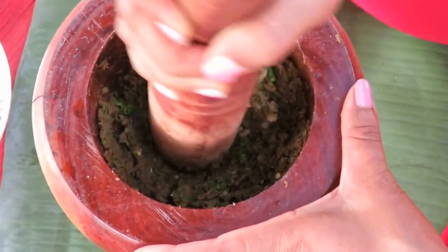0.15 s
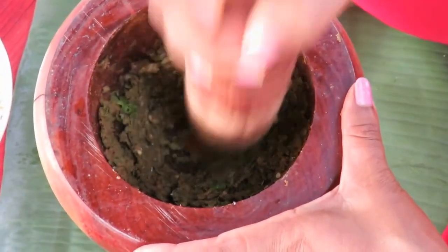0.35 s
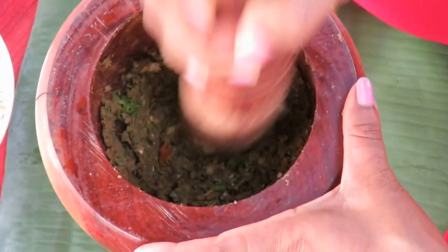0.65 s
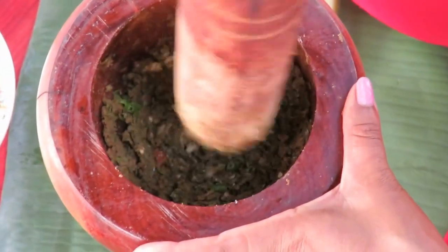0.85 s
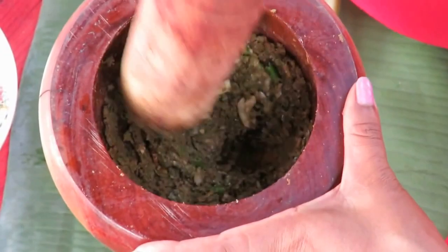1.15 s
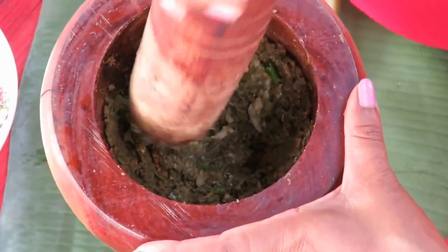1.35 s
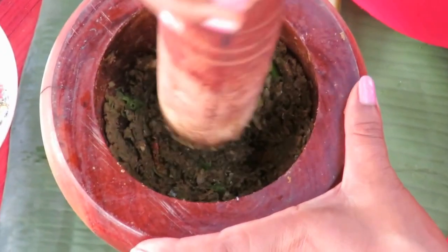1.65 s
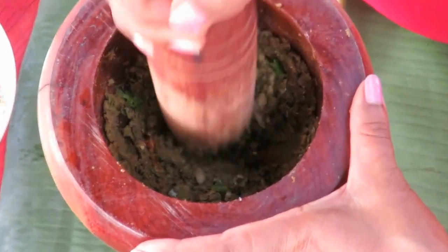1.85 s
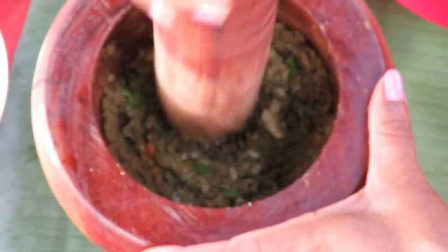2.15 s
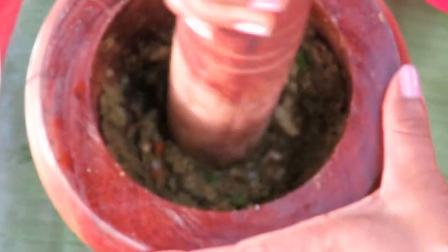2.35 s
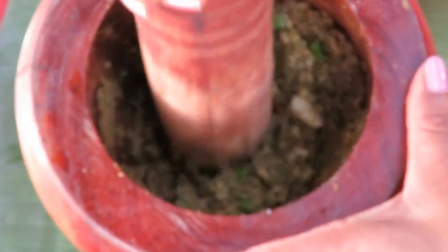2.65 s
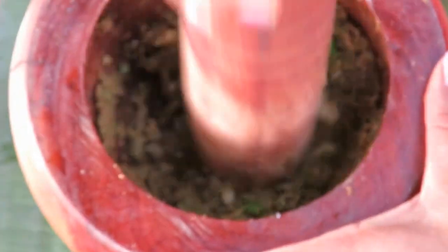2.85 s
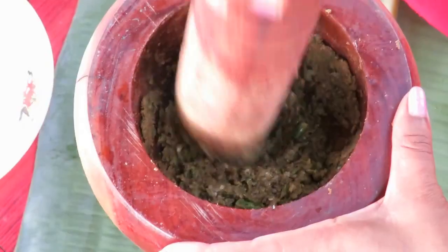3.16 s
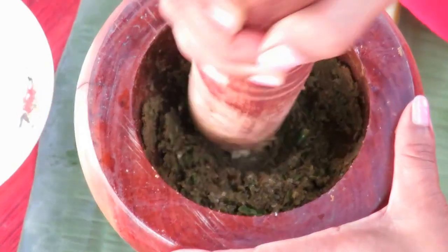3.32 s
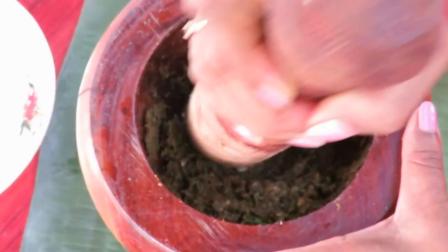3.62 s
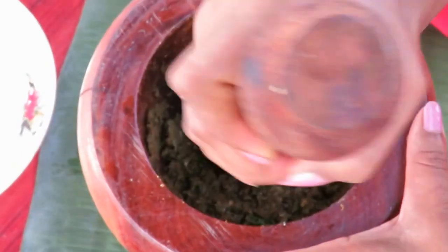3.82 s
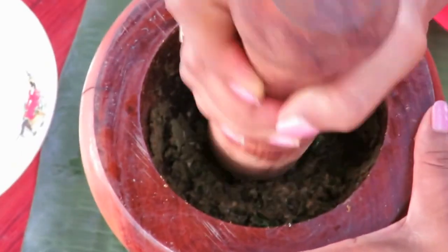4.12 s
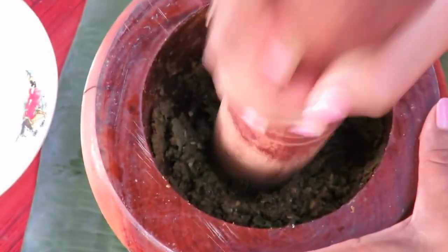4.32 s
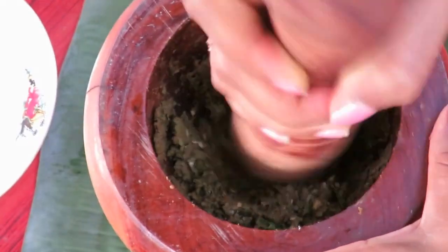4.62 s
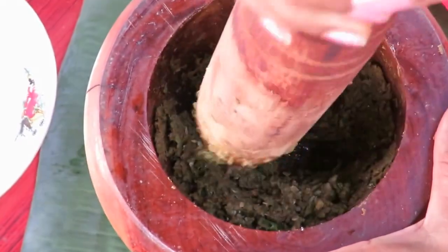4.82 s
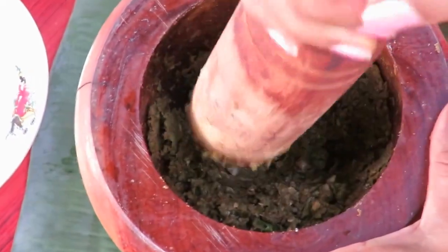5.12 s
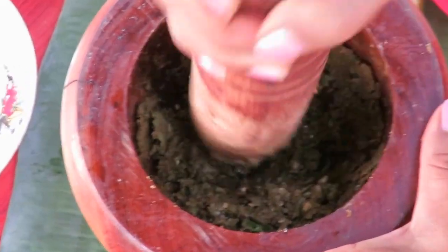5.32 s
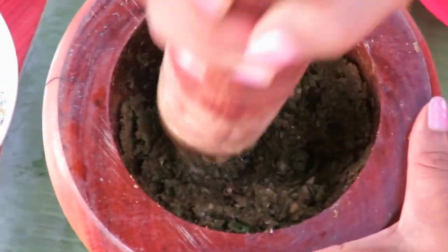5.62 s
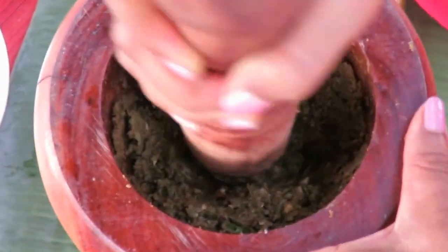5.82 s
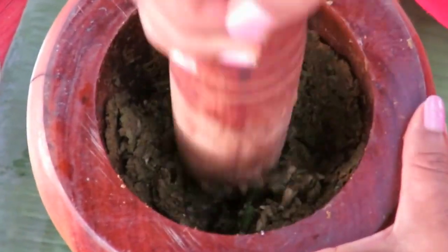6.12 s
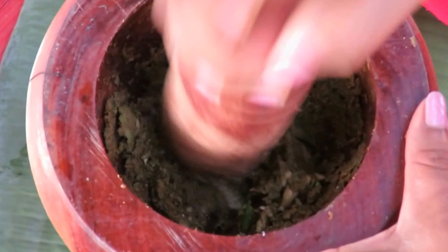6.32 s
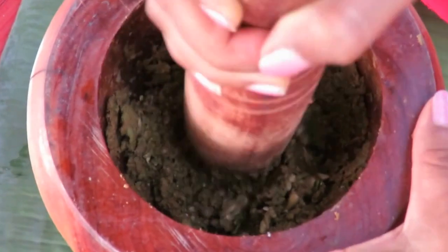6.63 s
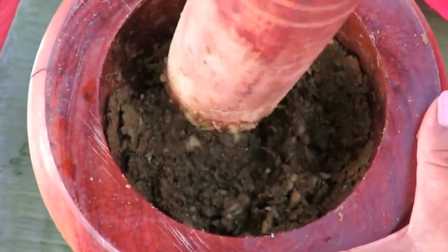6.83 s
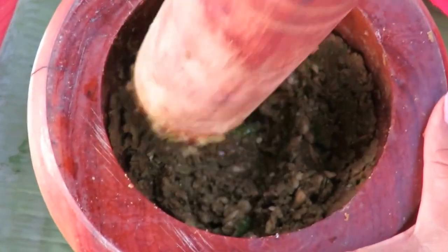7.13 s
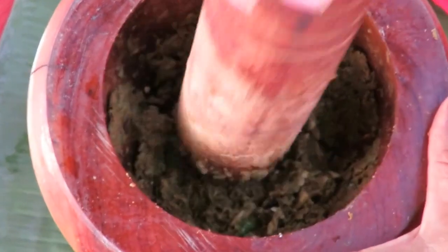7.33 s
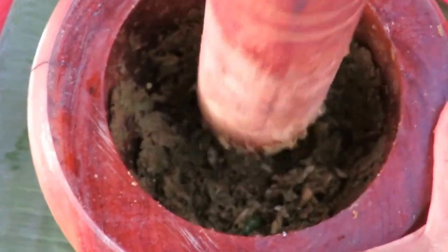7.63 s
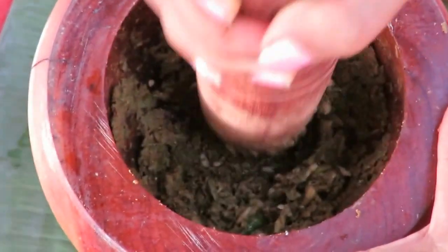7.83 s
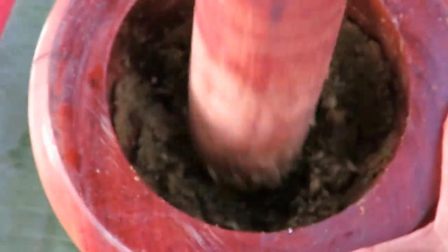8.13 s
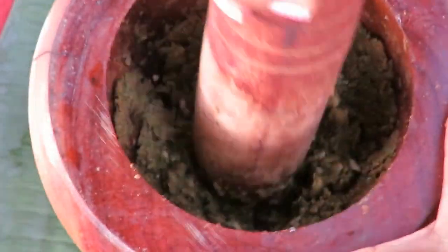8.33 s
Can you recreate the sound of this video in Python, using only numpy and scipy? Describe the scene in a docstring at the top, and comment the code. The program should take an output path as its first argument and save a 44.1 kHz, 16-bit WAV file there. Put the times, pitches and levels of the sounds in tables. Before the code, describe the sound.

Steady hollow wooden pounding in a mortar close up outdoors, uneven in force, each knock crunching wet grit and bumping wood over faint airy hiss.

```python
"""A wooden pestle pounds a coarse paste in a deep wooden mortar outdoors, three to four blows a second.
Each blow crunches grains of shaped noise, rings the modes of the wood and thumps the table; then the wood
bumps and chatters until the pestle is lifted. The first blow, at 0.2 s, is hard; two soft rubs of filtered
noise follow near 1 s, and more hard blows near 1.6, 3.5, 5.5 and 8.5 s. Wind gusts, hiss and rumble are noise.
The hardest blows overload the recorder; its gain control ducks and creeps back, the background with it."""
import sys
import numpy as np
from scipy import signal
from scipy.fft import rfft, irfft
from scipy.io import wavfile
from scipy.ndimage import uniform_filter1d

SR = 44100
rng = np.random.default_rng(int(sys.argv[2]) if len(sys.argv) > 2 else 0)


def pcm_store(signal):
    """Save signal as 16-bit PCM."""
    levels = np.round(np.clip(np.atleast_2d(signal), -1, 1) * 32767)
    wavfile.write(sys.argv[1], SR, levels.astype(np.int16).T)


N = 373527  # length in samples

# pestle blows: [t/s, thud of the base level/dB, low knock of the bowl level/dB, high knock level/dB,
#                crack of hard contact level/dB, crunch of the paste level/dB, crunch half length/s]
BLOWS = [(0.239, -7, 2.5, 14, -10.5, -41.5, 0.029), (0.5205, -25.5, -34, -30, -52, -47, 0.014),
         (0.8154, -17.5, -21.5, -28.5, -41.5, -43, 0.014), (1.089, -17, -28, -55, -43, -44, 0.017),
         (1.357, -13, -18, -21.5, -39.5, -44, 0.017), (1.624, -9.5, -0.5, 9, -18, -60, 0.055),
         (1.893, -7.5, -7.5, -29, -50.5, -72, 0.11), (2.175, -18, -21.5, -18, -35.5, -48, 0.019),
         (2.453, -14, -13, -17, -37, -39, 0.02), (2.709, -27.5, -43, -62, -68, -44.5, 0.033),
         (3.0209, -17, -16.5, -18.5, -39, -45.5, 0.0079), (3.046, -19, -5, -10, -60, -44, 0.017),
         (3.342, -7, -0.5, 6.5, -10, -48, 0.013), (3.624, -4, 1, 15.5, -14.5, -62, 0.059),
         (3.9041, -16, -32, -22, -37.5, -47, 0.013), (4.189, -8, -14, -17.5, -37, -41, 0.025),
         (4.48, -17.5, -43, -33, -39, -41.5, 0.013), (4.7495, -11.5, -7, -1, -15.5, -42, 0.031),
         (5.057, -19.5, -49, -23.5, -53, -41, 0.011), (5.3365, -5, 5, 8, -14, -57.5, 0.063),
         (5.624, -3, 0, 10, -20.5, -46.5, 0.04), (5.9038, -10.5, -4.5, 7, -23, -51, 0.049),
         (6.2163, -32, -39, -42, -68, -54.5, 0.012), (6.48, -15, -20, -17, -37, -46, 0.016),
         (6.7579, -14.5, -4.5, -0.5, -32.5, -44, 0.012), (7.0377, -16, -16, -13, -36.5, -46, 0.021),
         (7.3292, -17, -18.5, -19, -69, -41.5, 0.016), (7.6236, -11.5, -5.5, -0.5, -32.5, -48.5, 0.014),
         (7.892, -9.5, -6, 4.5, -26, -47, 0.037), (8.171, -19.5, -20, -25, -38, -43, 0.013),
         (8.4608, -5, -5.5, 8, -16.5, -45, 0.063)]
# bumps of pestle and mortar after a blow: [t/s, thud level/dB, knock level/dB]
REBOUNDS = [(0.001, -12, -9.5), (0.016, -11, -24), (0.04, -21.5, -10), (0.311, -22, -18.5),
            (0.55, -21, -21.5), (0.597, -30, -43), (0.845, -24, -18.5), (0.887, -23.5, -30),
            (1.109, -29, -21), (1.38, -28, -17.5), (1.41, -22.5, -10.5), (1.676, -22, -21),
            (1.911, -14.5, -21.5), (1.97, -27, -20.5), (2.19, -30, -12), (2.209, -35, -21),
            (2.254, -29.5, -63), (2.486, -24, -16), (2.536, -27.5, -30), (2.762, -26, -25),
            (2.803, -21.5, -27.5), (3.033, -17, -23), (3.067, -17, -9), (3.096, -22.5, -24),
            (3.13, -22, -20), (3.389, -21.5, -19.5), (3.655, -28, -22.5), (3.949, -25, -17),
            (4.237, -17.5, -10), (4.499, -16, -21.5), (4.522, -27, -13), (4.814, -27, -16.5),
            (5.08, -17.5, -12), (5.104, -27, -13.5), (5.12, -18, -23.5), (5.358, -21.5, -19.5),
            (5.676, -24, -17), (6.277, -30.5, -38), (6.533, -24.5, -13), (6.775, -38, -31),
            (7.059, -28, -35.5), (7.073, -55, -22), (7.087, -52, -59), (7.367, -29.5, -22.5),
            (7.4, -24.5, -43), (7.522, -35.5, -56), (7.666, -34, -21.5), (7.94, -39, -23.5),
            (8.195, -18.5, -17), (8.242, -25, -58)]
# the ringing modes of the wood: [f/Hz, level/dB, longest time to fall by 60 dB/s]
WOOD = [(142, -8.5, 0.01), (175.55, 3.5, 0.045), (198, -10.5, 0.09), (297, -8, 0.047), (374.5, -15, 0.046),
        (449.5, 0, 0.025), (519, -20.5, 0.079), (701, -1, 0.017), (862, -7.5, 0.016), (998, -2, 0.014),
        (1321, 1, 0.016), (1640.4, 1.5, 0.062), (2092, 0, 0.015), (2790, -2, 0.013), (3460, -7.5, 0.0098),
        (4060, -5.5, 0.0077), (6400, -16, 0.0074), (12300, -5.5, .003)]
# where thud, low knock, high knock and crack drive the modes: [f/Hz]
DRIVE_HZ = [215, 450, 715, 1640]


def from_db(db):
    """Turns decibels into gain."""
    return 10 ** (np.asarray(db) / 20)


def rms_one(x):
    """Scales a sound to an average (rms) level of 1."""
    return x / np.sqrt(np.mean(x ** 2) + 1e-20)


def at_hz(points, hz):
    """Reads between the points of a table on a log-frequency axis."""
    points = np.array(points)
    return np.interp(np.log(hz), np.log(points[:, 0]), points[:, 1])


def clicks(seconds, sizes):
    """Places single samples of the given sizes at the given times."""
    train = np.full(N, 1e-18)
    places = np.clip((np.asarray(seconds) * SR).astype(int), 0, N - 1)
    np.add.at(train, places, sizes)
    return train


def fade(x, t60):
    """Lets every sample die away, by 60 dB in t60 seconds."""
    return signal.lfilter([1], [1, -from_db(-60 / (t60 * SR))], x)


def ring(x, hz, t60):
    """A resonance: a click of size 1 sets off a sine of starting height 1 that dies away over t60."""
    r, w = from_db(-60 / (t60 * SR)), 2 * np.pi * hz / SR
    return signal.lfilter([0, np.sin(w)], [1, -2 * r * np.cos(w), r * r], x)


def band(x, low_hz, high_hz):
    """Keeps the frequencies between two limits."""
    return signal.sosfilt(signal.butter(2, [low_hz, high_hz], "band", fs=SR, output="sos"), x)


def swells(rows):
    """Adds up smooth bell-shaped rises and falls in level."""
    t = np.arange(N) / SR
    return sum(from_db(db) * np.exp(-((t - s) / half) ** 2) for s, db, half in rows)


def coloured(spectrum, mid, side):
    """Gives two noises a spectrum and mixes them into a stereo pair with rms 1."""
    # how alike left and right are: [f/Hz, likeness (1 = the same)]
    likeness = [(60, 1), (290, 0.31), (1400, 0.51), (6800, 0.21), (15000, 0.12)]
    hz = np.maximum(np.arange(N // 2 + 1) * SR / N, 1)
    alike = np.clip(at_hz(likeness, hz), -1, 1)
    shared = np.sqrt(1 + alike) * rfft(mid)
    opposed = np.sqrt(1 - alike) * rfft(side) * [[1], [-1]]
    return rms_one(irfft((shared + opposed) * from_db(at_hz(spectrum, hz)), N))


def mortar(chatter_per_s, chatter_db, chatter_t60):
    """Blows and rebounds ring the wood; small chance contacts chatter after each until the lift."""
    rebound_lasts = 0.72  # a bump thuds for this share of a blow's time
    chatter_cycles = 30  # wood still in contact rings no longer than this
    scrape_from_hz = 1500  # modes from here up get a steady scrape instead of single touches
    lift_s, lift_soft_s = 0.118, 0.018  # delay from blow to lift, and how gradually the chatter stops
    blows = [blow[:5] for blow in BLOWS]
    # rebounds are soft: far less crack than knock
    rebounds = [(s, thud, knock, knock - 4.0, knock - 31.0) for s, thud, knock in REBOUNDS]
    contacts = blows + rebounds

    out = np.zeros(N + SR)
    for k, (s, *levels_db) in enumerate(contacts):
        lasts = 1 if k < len(BLOWS) else rebound_lasts
        sound = strike(s, levels_db, detune=0.065, spread_db=1.87, lasts=lasts)
        out[int(s * SR):int(s * SR) + len(sound)] += sound
    out = out[:N]

    touches = rng.random(N) < chatter_per_s / SR
    t = np.arange(N) / SR
    landed = np.append(0, np.transpose(BLOWS)[0])
    since_blow = t - landed[np.searchsorted(landed, t, "right") - 1]
    down = 1 / (1 + np.exp((since_blow - lift_s) / lift_soft_s))
    chatter_starts = np.transpose(contacts)[0] + 0.016
    for hz, level_db, t60 in WOOD:
        drive_db = np.array([np.interp(np.log(hz), np.log(DRIVE_HZ), row[1:]) for row in contacts])
        # chatter never gets hard: the higher the mode, the less it takes
        most_db = -15 - 5.3 * np.log2(hz / 215)
        chance_db = 4 * rng.uniform(-1, 1, len(contacts))
        starts = clicks(chatter_starts, from_db(np.minimum(drive_db, most_db) + chance_db))
        after = fade(starts, chatter_t60)
        contact = touches if hz < scrape_from_hz else np.sqrt(chatter_per_s / SR)
        push = contact * down * after * np.clip(rng.standard_normal(N), -2, 2)
        out += from_db(level_db + chatter_db) * ring(push, hz, min(t60, chatter_cycles / hz))
    # a small body radiates little below its lowest mode
    return signal.sosfilt(signal.butter(6, 125, "high", fs=SR, output="sos"), out)


def strike(s, levels_db, detune, spread_db, lasts):
    """One contact: every mode swells in and rings, a little off its pitch as grip and paste shift."""
    ring_cycles = 80  # the paste smothers a ring within so many cycles
    steady_above_hz = 300  # above this, the shift in pitch gets ever smaller
    hz, level_db, t60 = (column[:, None] for column in np.transpose(WOOD))
    t60 = np.where(hz <= DRIVE_HZ[0], lasts, 1) * np.minimum(t60, ring_cycles / hz)
    t = np.arange(int(0.2 * SR)) / SR
    drive_db = np.interp(np.log(hz), np.log(DRIVE_HZ), levels_db)
    spread, shift, phase = rng.standard_normal((3, len(WOOD), 1))
    swell = 1 - np.exp(-(t / (0.00068 + 0.35 / hz)) ** 2)  # low modes swell in more slowly
    height = from_db(level_db + drive_db + spread_db * spread - 60 * t / t60)
    shifted_hz = hz * (1 + detune * np.minimum(steady_above_hz / hz, 1) * shift)
    rings = height * np.sin(2 * np.pi * shifted_hz * t + 0.5 * phase)
    return np.sum(swell * rings, axis=0)


def table():
    """The table top flexes under each blow: a softened push rings one deep, short resonance."""
    base_db, follows = -35, 0.71  # level, and the share of the high knock's dB added to it
    s, _, _, knock_db = np.transpose(BLOWS)[:4]
    push = signal.lfilter([0.02], [1, -0.98], clicks(s, from_db(base_db + follows * knock_db)))
    return ring(push, hz=47.3, t60=0.072)


def paste(grains_per_s, grain_db, bowl_db, lead_db, lead_s):
    """Uneven grains break under each press and around each impact, and set the upper modes humming."""
    # more crunches of the paste, many just before a blow or by a bump: [peak t/s, level/dB, half length/s]
    more_crunches = [(0.005, -44.5, 0.033), (0.507, -52, 0.0068), (0.799, -54, 0.0089),
                     (1.138, -57.5, 0.016), (1.347, -46, 0.0073), (1.431, -54, 0.014),
                     (2.159, -55.5, 0.011), (2.26, -56, 0.006), (3.009, -43.5, 0.0057), (4.258, -48, 0.021),
                     (4.532, -53.5, 0.065), (4.831, -53.5, 0.0061), (5.044, -39.5, 0.0061),
                     (5.123, -53, 0.013), (6.193, -51, 0.018), (6.546, -54, 0.025), (7.612, -46.5, 0.011),
                     (8.16, -44, 0.0064)]
    # a hard grain breaks: [t/s, level/dB]
    snaps = [(3.115, -59.5), (8.249, -64)]
    # spectrum of the crunch: [f/Hz, relative level per Hz/dB]
    grit_spectrum = [(700, -6), (2460, -2.5), (4230, -8), (8700, -24), (13800, -30.5), (15000, -37)]
    snap_s, snap_db = 0.002, 31.5  # half length of a snap; its size over the fine grains
    press_lead_s, peak_share = 0.0058, 0.47  # press starts before the blow, peaks at a share of half length
    bump_db, bump_s = -63, 0.031  # each bump crushes a little more paste
    rise_share, rise_s = 0.45, 0.007  # a crunch rises over this share of its half length, at most rise_s
    grain_cycles = 12  # each grain rings briefly at a pitch of its own

    presses = [(s - press_lead_s + peak_share * half, db, half) for s, *_, db, half in BLOWS]
    impacts = [(blow[0], blow[4] + lead_db, lead_s) for blow in BLOWS]
    bumps = [(s, bump_db, bump_s) for s, *_ in REBOUNDS]
    breaks = [(s, db, snap_s) for s, db in snaps]
    t, shape = np.arange(N) / SR, np.zeros(N)
    for s, db, half in presses + impacts + bumps + more_crunches + breaks:
        near = slice(max(int((s - 3 * half) * SR), 0), int((s + 5 * half) * SR))
        from_peak = t[near] - s
        width = np.where(from_peak < 0, min(rise_share * half, rise_s), half)
        shape[near] += from_db(db) * np.exp(-(from_peak / width) ** 2)

    sizes = from_db(grain_db * np.minimum(rng.exponential(1, (2, N)), 5)) * rng.choice([-1, 1], (2, N))
    # grains break in clumps of about 3 ms, each pitch in its own
    clumps = np.repeat(rng.gamma(3, 1 / 3, N // 128 + 1), 128)[:N]
    grains = sizes * (rng.random((2, N)) < grains_per_s / SR)
    pitches = np.geomspace(504, 13400, num=16)
    dealt = rng.integers(len(pitches), size=N)
    pair = 0
    for k, hz in enumerate(pitches):
        struck = np.roll(clumps, k * N // 17) * grains * (dealt == k) + 1e-18
        pair = pair + hz * ring(struck, hz, max(grain_cycles / hz, snap_s))
    mid, side = rms_one(pair)
    hard_grains = clicks(np.transpose(snaps)[0], from_db(snap_db))
    grit = shape * coloured(grit_spectrum, mid + hard_grains, 0.5 * side)
    hum = sum(from_db(level_db) * ring(grit[0], hz, t60) for hz, level_db, t60 in WOOD[7:15])
    return grit + from_db(bowl_db) * hum


def yard(x, t60, low_hz, high_hz):
    """Scattered echoes from table and walls nearby: fading noise, different in each ear."""
    t = np.arange(int(0.3 * SR)) / SR
    tail = rng.standard_normal((2, len(t))) * from_db(-60 * t / t60) * np.minimum(t / 0.019, 1)
    tail = signal.sosfilt(signal.butter(1, [low_hz, high_hz], "band", fs=SR, output="sos"), tail)
    tail = tail / np.sqrt(np.sum(tail ** 2) / 2)
    return signal.fftconvolve(x[None], tail, axes=1)[:, :N]


def rubs():
    """Skin or wood rubs softly: swelling band-passed noise."""
    # soft swishes: [peak t/s, level/dB, half length/s]
    swishes = [(1.045, -57.5, 0.053), (1.3, -57.5, 0.028)]
    return swells(swishes) * rms_one(band(rng.standard_normal(N), 1085, 2500))


def wind():
    """Wind on the microphone: gusts of low noise with a lumpy level, different in each ear."""
    # gusts: [peak t/s, level/dB, half length/s]
    gusts = [(.17, -47.5, 0.1), (3.17, -46.5, 0.052), (4.45, -50, 0.11), (7.2, -51.5, 0.066),
             (7.49, -44, 0.066)]
    lumps_db = 1  # typical size of the ups and downs
    knots = rng.standard_normal((2, N // 1000 + 2))  # one chance level every 1000 samples
    lumps = [from_db(lumps_db * np.interp(np.arange(N) / 1000, np.arange(len(k)), k)) for k in knots]
    noise = band(rng.standard_normal((2, N)), 55, 158)
    return swells(gusts) * rms_one(lumps * noise)


def background():
    """Broad outdoor hiss over a low rumble: two shaped noises whose levels drift."""
    # level of the background over time: [t/s, hiss level/dB, rumble level/dB]
    levels = [(0, -54.5, -53), (.4, -62.5, -67.5), (2.95, -60.5, -58.5), (3.15, -52, -53.5),
              (3.33, -48, -55), (3.6, -56.5, -57.5), (4.999, -55, -59), (5.25, -52.5, -59),
              (5.5, -59, -67.5), (7.098, -63, -59.5), (7.451, -60.5, -60), (7.7, -62.5, -63.5),
              (8.47, -58, -61.5)]
    # spectrum of the hiss: [f/Hz, relative level per Hz/dB]
    air_spectrum = [(70, -27), (120, 1.5), (450, -7.5), (900, -8.5), (3200, -17.5), (6400, -28),
                    (12500, -47.5), (15000, -66.5)]
    # spectrum of the rumble: [f/Hz, relative level per Hz/dB]
    rumble_spectrum = [(15, -27.5), (45, -9.5), (63, 3.5), (85, -4), (200, -43)]
    s, air_db, rumble_db = np.transpose(levels)
    t = np.arange(N) / SR
    air = coloured(air_spectrum, *rng.standard_normal((2, N)))
    rumble = coloured(rumble_spectrum, *rng.standard_normal((2, N)))
    return from_db(np.interp(t, s, air_db)) * air + from_db(np.interp(t, s, rumble_db)) * rumble


def gain_control(dry):
    """A loud peak pulls the gain down a moment later; then it climbs back at a steady rate."""
    start_db, at_full_db = -2.5, -0.64  # gain at the start; most gain allowed after a peak of 0 dB
    duck = 0.48  # dB less gain allowed per dB of peak
    rise_db_per_s, lag_s = 6, 0.12
    step = 256  # samples per peak reading
    blocks = np.abs(dry[:, :N // step * step]).reshape(2, -1, step)
    peak_db = 20 * np.log10(blocks.max(axis=(0, 2)) + 1e-9)
    s = np.append(0, np.arange(len(peak_db)) * step / SR + lag_s)
    allowed_db = np.append(start_db, at_full_db - duck * peak_db)
    # the lowest limit so far, with every limit rising steadily
    climb_db = rise_db_per_s * s
    gain_db = np.minimum.accumulate(allowed_db - climb_db) + climb_db
    return from_db(uniform_filter1d(np.interp(np.arange(N) / SR, s, gain_db), size=1500))


def scene():
    """Mixes the mortar near the middle with table, paste, echoes, rubs, wind and background."""
    wood = mortar(chatter_per_s=700.0, chatter_db=-18.0, chatter_t60=0.19)
    echo = from_db(-29.0) * yard(wood, t60=0.13, low_hz=148, high_hz=4670)
    crunch = paste(9800.0, grain_db=1.0, bowl_db=-39.0, lead_db=-12.0, lead_s=0.003)
    # this band of the wood is louder on the right
    uneven = from_db(-19) * band(wood, 290, 438.7) * [[-1], [1]]
    thump = table() * from_db([[0.9], [-0.9]])  # a little louder on the left
    return wood + uneven + thump + echo + crunch + rubs() + wind() + background()


def record(dry):
    """The recorder: gain control, hard overload, then a steep cut of the top."""
    steep = signal.cheby2(10, 50, 15600, fs=SR, output="sos")
    overloaded = np.clip(dry * gain_control(dry), -1, 1)
    return np.clip(signal.sosfilt(steep, overloaded), -1, 1)


dry = scene()
out = record(dry)
pcm_store(out)
```